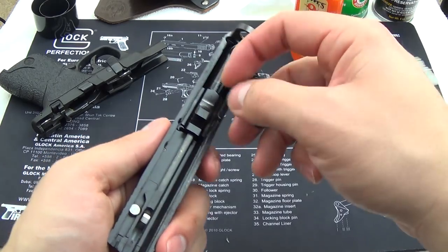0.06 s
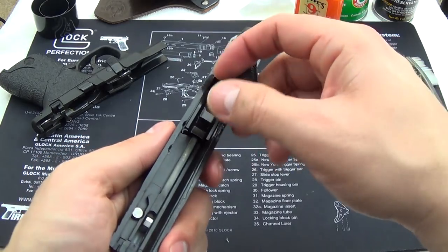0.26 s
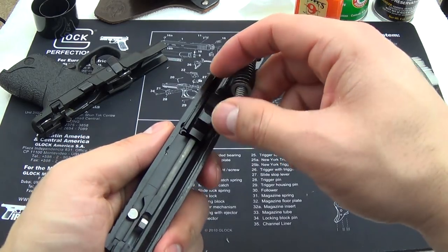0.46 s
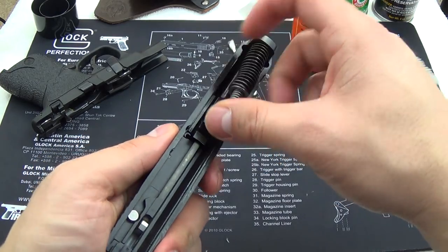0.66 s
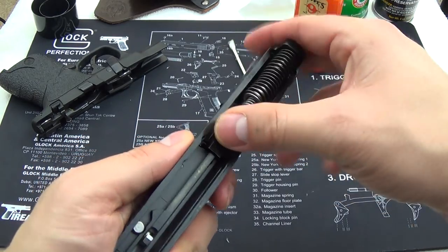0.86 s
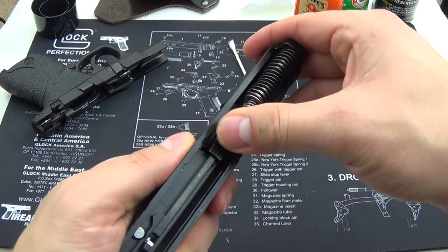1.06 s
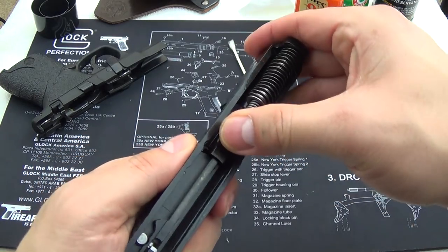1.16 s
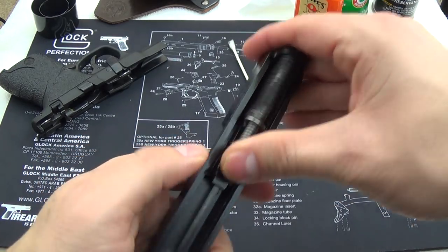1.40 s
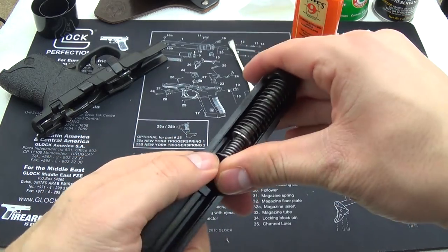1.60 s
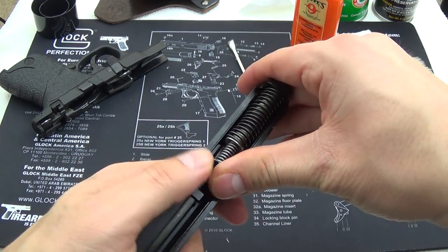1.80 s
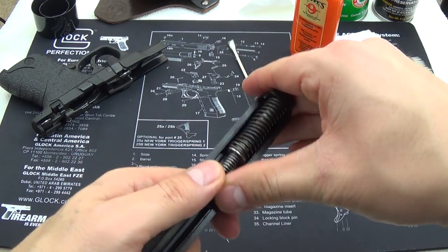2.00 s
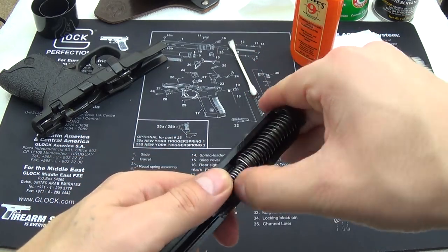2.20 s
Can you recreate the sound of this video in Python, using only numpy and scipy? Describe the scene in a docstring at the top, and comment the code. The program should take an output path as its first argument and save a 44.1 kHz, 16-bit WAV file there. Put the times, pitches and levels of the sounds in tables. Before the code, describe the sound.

Steel pistol parts click under handling, close and dry in a quiet room. A bright clack at 0.2 s leads into quick rattling taps until 0.35 s; another cluster comes at 0.53-0.55 s, then a sharp rod tick at 0.66 s. Sparse light ticks follow at 1.1 and 1.23 s, a finger rub near 1.4 s, a ringing tap at 1.54 s, and soft duller knocks from 1.8 s. Faint hiss and hum underneath.

```python
"""In a quiet room, hands fit a recoil spring and its rod into a steel pistol slide over a table, close by.
Each contact is a dry crack with a puff of hiss, and the loose barrel, the slide and the rod ring as fading sines.
Tiny random knocks make the barrel chatter and the rod scrape; shaped noise and knocks make fingertips rub.
An echo of the steel, room air, microphone hiss, a wavering mains hum and a thin whine lie beneath."""
import sys
import numpy as np
from scipy import signal
from scipy.fft import rfft, irfft, next_fast_len
from scipy.io import wavfile
from scipy.ndimage import map_coordinates

SR = 44100
rng = np.random.default_rng(int(sys.argv[2]) if len(sys.argv) > 2 else 0)


def gain_from_decibels(decibels):
    """Convert decibel values to linear amplitude factors."""
    exponent = np.asarray(decibels, float) / 20
    return 10 ** exponent


def log_audio(samples):
    """Write samples as a 16-bit WAV file to the path given in sys.argv[1]."""
    # one column per channel
    frames = np.atleast_2d(samples).T
    # limit to full scale, then quantise
    limited = np.clip(frames, -1, 1)
    pcm = np.round(limited * 32767).astype(np.int16)
    wavfile.write(sys.argv[1], SR, pcm)


N = 99225
TREBLE_HZ = 6760  # where the adjustable treble begins

# Ringing tones of the barrel: f/Hz
BARREL_PITCHES = [2380, 2590, 3470, 4200, 8340, 9465, 10285, 11390, 12335]
# How strong each barrel tone is and how long it takes to fall by 60 dB: level/dB, t60/s
BARREL_TONES = [(-2, 0.022), (-15, 0.066), (-3, 0.024), (-12, 0.0093), (-17, 0.024), (-5, 0.022),
                (-7, 0.015), (-9, 0.033), (-5.5, 0.018)]
# Ringing tones of the rod: f/Hz
ROD_PITCHES = [2340, 3070, 3870, 4040, 4950, 5300, 7700, 10910]
# How strong each rod tone is and how long it takes to fall by 60 dB: level/dB, t60/s
ROD_TONES = [(-16.5, 0.022), (-23, .025), (3, 0.005), (-6, 0.021), (-8, 0.01), (-13, 0.016), (-21, 0.021),
             (-4.5, 0.015)]


def unit(x):
    """Scales a sound to an rms level of 1."""
    return x / np.sqrt(np.mean(x ** 2) + 1e-20)


def along(points, hz):
    """Reads a curve of (f/Hz, value) points, with frequency on a log axis."""
    f, value = np.transpose(points)
    return np.interp(np.log(hz + 1), np.log(f + 1), value)


def filtered(x, response):
    """Changes the spectrum of a sound by a gain that depends on frequency."""
    size = next_fast_len(x.shape[-1] + 8192)
    spectrum = rfft(x, size) * response(np.fft.rfftfreq(size, 1 / SR))
    return irfft(spectrum, size)[..., :x.shape[-1]]


def lifted(hz, lift_db):
    """Gain that raises (or, if negative, lowers) mainly the treble."""
    return gain_from_decibels(lift_db / (1 + (TREBLE_HZ / (hz + 1)) ** 8))


def ring(pitches, tones, t, lift_db):
    """A struck part rings as several sines that fade at their own rates, never twice quite the same."""
    scatter_db, attack_s = 0.5, 0.00011
    hz = np.array(pitches)[:, None]
    level_db, t60 = np.transpose(tones)[:, :, None]
    luck = rng.standard_normal((len(tones), 2))
    strength_db = level_db + scatter_db * luck[:, :1]
    gain = gain_from_decibels(strength_db - 60 * t / t60) * lifted(hz, lift_db)
    sign = np.sign(luck[:, 1:])
    attack = 1 - np.exp(-t / attack_s)
    return (gain * sign * np.sin(2 * np.pi * hz * t)).sum(0) * attack


def puff(t, lift_db):
    """A short hiss after a contact: fading noise above 1500 Hz."""
    level_db, t60_s = -12.5, 0.049  # level against the crack's own
    hiss = filtered(rng.standard_normal(len(t)), lambda hz: (hz > 1500) * lifted(hz, lift_db))
    return gain_from_decibels(level_db - 60 * t / t60_s) * hiss


def taps():
    """Each contact gives a dry crack and a puff, and sets the three steel parts ringing."""
    # Contacts, one per row: t/s, crack level/dB, crack treble lift/dB, barrel level/dB,
    # barrel treble lift/dB, slide level/dB, rod level/dB
    contacts = [(0.2101, -26, 21.5, -28, -8, -29.5, -27), (0.2531, -38.5, 21, -41, 17, -37.5, -60),
                (.2825, -52, 0, -46, 0, -64, -70), (0.2863, -34.5, -3, -27.5, -10, -39, -60),
                (.3085, -57, 0, -37, -3, -52, -68), (0.3205, -45, 10, -54.5, 9.5, -54, -65),
                (.3355, -50, 0, -47.5, -9, -66, -70), (.3545, -56, 4, -48, -7, -57, -68),
                (.4535, -61, 0, -57, 5, -63, -62), (0.5347, -36, 0, -43, 0, -62, -70),
                (.5448, -41, 6, -43.5, 8, -64, -58), (.551, -27.5, 3, -37, 14.5, -42, -50),
                (0.601, -64, 4, -57, 9, -65, -68), (0.6594, -43, 0, -58, 0, -67, -54),
                (0.663, -33.5, -15, -68, 2, -46, -15), (0.7628, -55, 6, -55, 11, -67, -62),
                (.79, -45, 2, -57, 0, -70, -48), (.801, -46, 6, -56, 2, -68, -59),
                (.916, -57.5, 10, -61, 10, -68, -66), (1.1055, -35, 0.5, -48.5, -4, -66, -35),
                (1.2344, -38.5, 0, -51, -10, -56, -51), (1.5412, -35, -0.5, -50.5, 8, -27, -42),
                (1.559, -44, -11, -59, -6, -69, -47), (1.676, -52.5, -11, -60, -5, -59, -62),
                (1.8187, -52, 7, -64, 0, -58, -52), (1.855, -56, 4, -69, 0, -71, -53),
                (1.925, -45, -10, -48, -17, -66, -56), (1.9359, -45, -6, -51, -15, -61, -52.5),
                (1.9843, -42, -9, -47, -23, -59, -47), (2.0244, -42, -2, -44, -26, -33.5, -40),
                (2.1423, -53, -8, -59, -10, -68, -49.5), (2.214, -58, 2, -55, 0, -75, -56)]
    # The contact itself, broad bands that die fast: f/Hz
    crack_pitches = [1000, 1450, 2200, 3100, 4500, 6000, 8200, 9800, 11000, 12300, 14700]
    # Strength and fading of those bands: level/dB, t60/s
    crack_tones = [(-16, 0.017), (-16.5, 0.016), (-7, 0.012), (-3, 0.0045), (-2.5, 0.0054), (-2.5, 0.004),
                   (-16.5, 0.0062), (-11, 0.0071), (-4.5, 0.0051), (-3.5, 0.0026), (-18, 0.0031)]
    # Ringing tones of the slide before the spring bears on it: f/Hz
    slide_pitches = [5195, 10280]
    # Their strength and fading, again before the spring bears on it: level/dB, t60/s
    slide_tones = [(-5.5, 0.069), (-18, 0.014)]
    seated_s = 0.65  # from here on the spring bears on the slide
    out = np.zeros(N + SR)
    t = np.arange(SR // 8) / SR
    for start_s, crack_db, crack_lift_db, barrel_db, barrel_lift_db, slide_db, rod_db in contacts:
        # under the spring the slide rings higher and dies sooner
        pitch, damping = (1.013, 1.24) if start_s > seated_s else (1, 1)
        crack = ring(crack_pitches, crack_tones, t, crack_lift_db) + puff(t, crack_lift_db / 2)
        barrel = ring(BARREL_PITCHES, BARREL_TONES, t, barrel_lift_db)
        # running time faster shortens the ringing; dividing by damping keeps the pitch
        slide = ring(np.multiply(slide_pitches, pitch / damping), slide_tones, t * damping, 0)
        rod = ring(ROD_PITCHES, ROD_TONES, t, 0)
        blow = gain_from_decibels(crack_db) * crack + gain_from_decibels(barrel_db) * barrel + gain_from_decibels(slide_db) * slide + gain_from_decibels(rod_db) * rod
        out[round(start_s * SR):][:len(t)] += blow
    return out[:N]


def strokes(rows, sound):
    """Lets a steady sound swell and fade in strokes, each with its own brightness."""
    rise_share = 0.46  # part of a stroke spent swelling
    t = np.arange(N) / SR
    out = np.zeros(N)
    dull = filtered(sound, lambda hz: hz < TREBLE_HZ)
    treble = sound - dull
    for start_s, length_s, level_db, lift_db in rows:
        corners = [start_s, start_s + rise_share * length_s, start_s + length_s]
        swell = np.sin(np.pi / 2 * np.interp(t, corners, [0, 1, 0]))
        out += gain_from_decibels(level_db) * swell * (dull + gain_from_decibels(lift_db) * treble)
    return out


def grit():
    """Rubbing is made of tiny contacts at random moments, uneven in size."""
    grains_per_s, spread_db = 3000, 2.5
    luck = rng.random((2, N))
    happens = luck[0] < grains_per_s / SR
    size = gain_from_decibels(-spread_db * np.log(luck[1] + 1e-9))
    return happens * size * rng.standard_normal(N)


def grit_ringing(pitches, tones):
    """Every grain of grit sets a steel part ringing a little."""
    t = np.arange(SR // 8) / SR
    return unit(signal.fftconvolve(grit(), ring(pitches, tones, t, 0))[:N])


def barrel_chatter():
    """The barrel chatters along the slide, rung by grit."""
    # Strokes: start t/s, length/s, level/dB, treble lift/dB
    chatter = [(.212, 0.044, -53, 5.5), (.255, 0.049, -63.5, 10), (.295, 0.048, -54, 0),
               (.445, .035, -56, -1.5), (.5, 0.067, -55, 5), (.555, 0.056, -76, -1)]
    return strokes(chatter, grit_ringing(BARREL_PITCHES, BARREL_TONES))


def rod_scrapes():
    """The rod and coils scrape, heard as grit ringing the rod."""
    # Strokes: start t/s, length/s, level/dB, treble lift/dB
    scrapes = [(.665, 0.041, -58, -13), (.75, 0.075, -60, 6), (1.4, 0.15, -69, 0), (2.1, 0.067, -58.5, -12),
               (2.21, 0.024, -54, -13)]
    return strokes(scrapes, grit_ringing(ROD_PITCHES, ROD_TONES))


def finger_rubs():
    """Fingertips rub on steel: skin hisses as smooth noise mixed with grit."""
    # Strokes: start t/s, length/s, level/dB, treble lift/dB
    rubs = [(-.04, 0.087, -71, 11.5), (.212, 0.047, -50, -1.5), (.49, 0.057, -68, 8), (.75, 0.078, -62, 7),
            (.9, 0.06, -70, 0), (1.35, 0.052, -60.5, 6), (1.385, 0.11, -54, 1), (1.815, 0.021, -60, 3),
            (2.09, 0.081, -55.5, -7), (2.205, 0.033, -66.5, 2)]
    # Tone colour of rubbing skin: f/Hz, level/dB
    skin_colour = [(250, -14), (450, -2), (900, -24), (2000, 1), (3300, 4.5), (4700, 4), (7000, 0),
                   (10500, 8), (13500, 3), (16000, -3)]
    rough = rng.standard_normal(N) + 2.0 * grit()
    skin = unit(filtered(rough, lambda hz: gain_from_decibels(along(skin_colour, hz))))
    return strokes(rubs, skin)


def room(x):
    """The room answers with a fading tail of noise, different in each channel; treble dies sooner."""
    # Time for the tail to fall by 60 dB: f/Hz, t60/s
    fading = [(1000, 0.49), (4000, 0.21), (12000, 0.03)]
    gap_s = 0.004  # extra wait before the answer
    hz, t, noise = signal.stft(rng.standard_normal((2, SR // 3)), SR, nperseg=256)
    decay = gain_from_decibels(-60 * t / along(fading, hz)[:, None])
    tail = signal.istft(noise * decay, SR, nperseg=256)[1]
    late = np.pad(x, (round(gap_s * SR), 0))[None]
    return signal.fftconvolve(late, tail / np.linalg.norm(tail[0]), axes=1)[:, :N]


def air_and_hiss():
    """Room air and microphone hiss: shaped noise, with a shared middle and a stereo side."""
    # Tone colour of the noise: f/Hz, level/dB (only relative)
    colour = [(15, -39), (25, -5.5), (155, -4), (266, -4), (321, -5), (443, -5.5), (868, -10.5),
              (1230, -9.5), (2170, -11), (2350, -11), (11500, -15.5), (15400, -16)][1:-1]
    # Stereo width: f/Hz, side over middle/dB
    width = [(60, -18), (110, -14), (200, -9.5), (380, -5), (700, 1), (1290, 0), (2380, -2), (4400, -6.5),
             (8120, -10.5), (15000, -18.5)]
    middle_db = -60.5  # rms
    noise = rng.standard_normal((2, N))
    mid, side = filtered(noise, lambda hz: gain_from_decibels(along(colour, hz)) * [hz ** 0, gain_from_decibels(along(width, hz))])
    return gain_from_decibels(middle_db) * np.array([mid + side, mid - side]) / mid.std()


def hum_and_whine():
    """A mains hum whose level wavers at random, and a steady thin whine: two sines."""
    hum_hz, hum_db = 120, -78  # rms level around which it wavers
    whine_hz, whine_db = 15734.3, -72.5  # rms level ahead of the band limit
    t = np.arange(N) / SR
    waver_db = 2.5 * map_coordinates(rng.standard_normal(30), [t * 8])  # 8 random points a second
    hum = gain_from_decibels(hum_db + waver_db) * np.sin(2 * np.pi * hum_hz * t)
    whine = gain_from_decibels(whine_db) * np.sin(2 * np.pi * whine_hz * t)
    return np.sqrt(2) * (hum + whine)  # a sine's peak is sqrt(2) times its rms


def scene():
    """Steel in front, slightly to the left, with the room and background around it."""
    pan_db, room_db = 0.8, -19
    contacts = taps() + barrel_chatter() + rod_scrapes() + finger_rubs()
    # two gentle low cuts at 250 Hz
    steel = filtered(contacts, lambda hz: (1j * hz / (250 + 1j * hz)) ** 2)
    front = steel * gain_from_decibels([[pan_db], [-pan_db]])
    return front + gain_from_decibels(room_db) * room(steel) + air_and_hiss() + hum_and_whine()


def band_limit(x):
    """A steep low-pass at the top of the band."""
    return signal.sosfilt(signal.butter(12, 16860, fs=SR, output="sos"), x)


def record(dry):
    """The camera's band limit cuts steeply above its top frequency."""
    top_hz = 15950
    limited = filtered(dry, lambda hz: 1 / np.sqrt(1 + (hz / top_hz) ** 120))
    return band_limit(limited)


dry = scene()
out = record(dry)
log_audio(out)
```